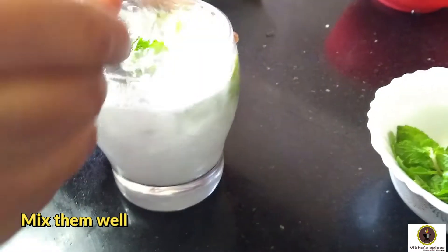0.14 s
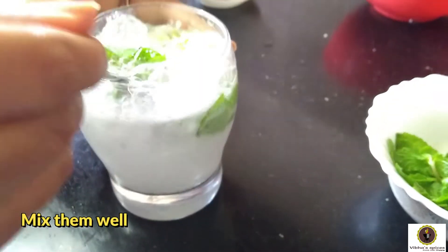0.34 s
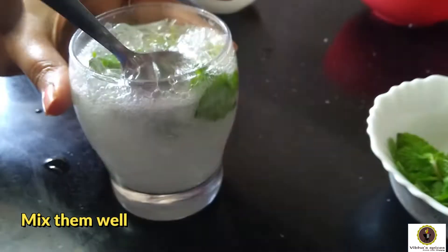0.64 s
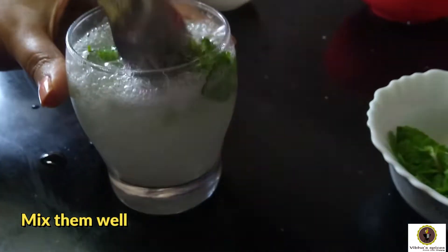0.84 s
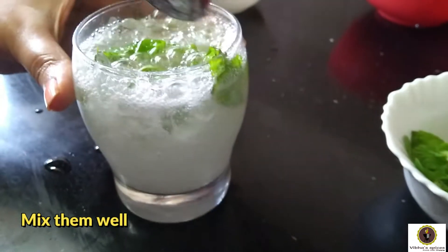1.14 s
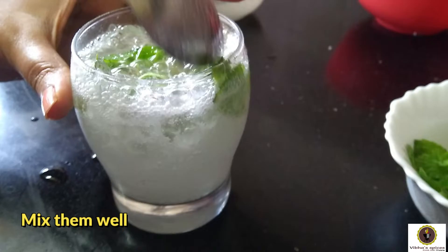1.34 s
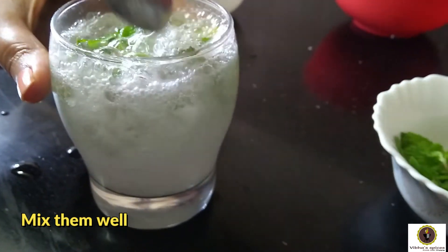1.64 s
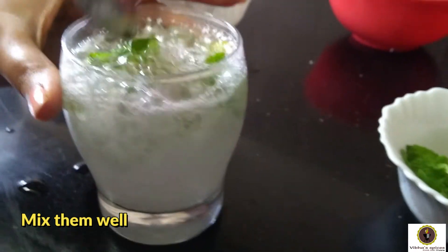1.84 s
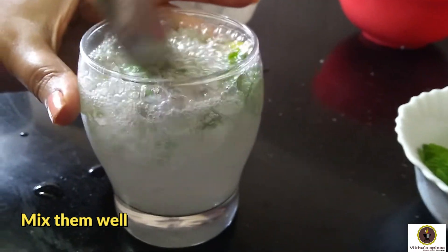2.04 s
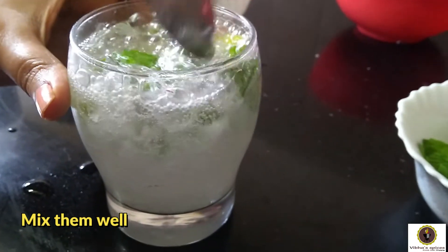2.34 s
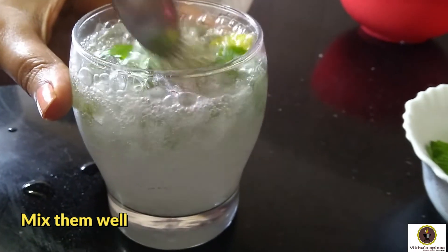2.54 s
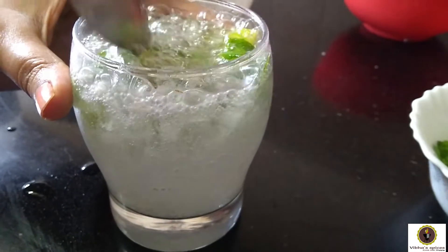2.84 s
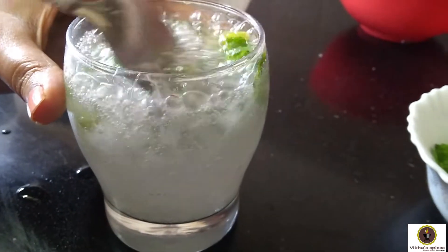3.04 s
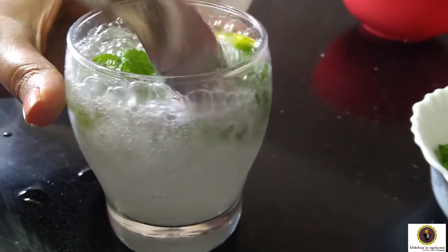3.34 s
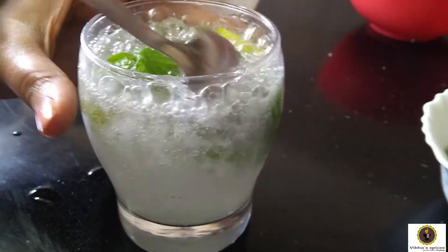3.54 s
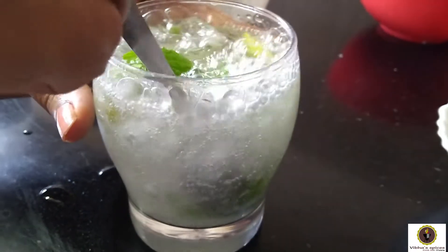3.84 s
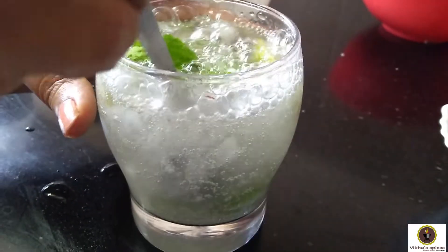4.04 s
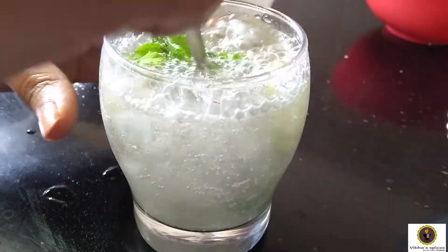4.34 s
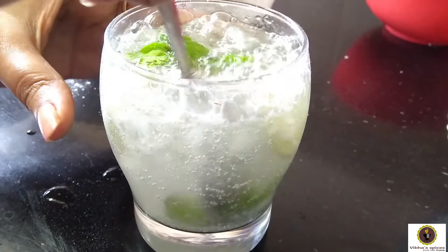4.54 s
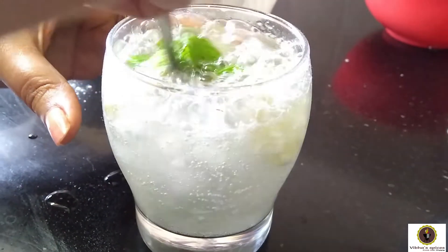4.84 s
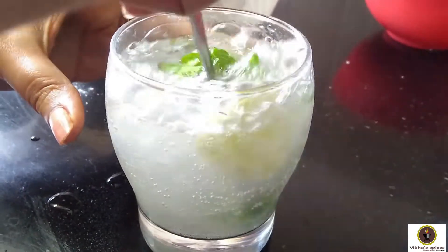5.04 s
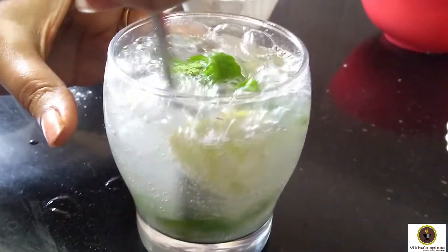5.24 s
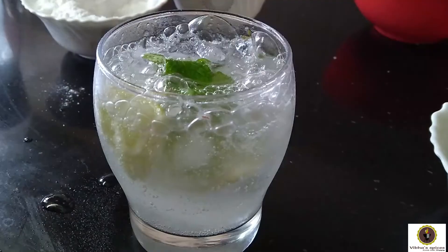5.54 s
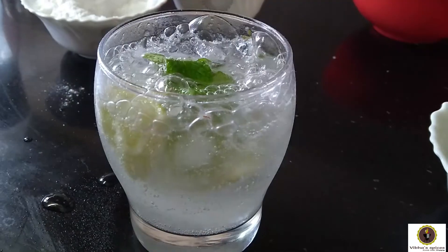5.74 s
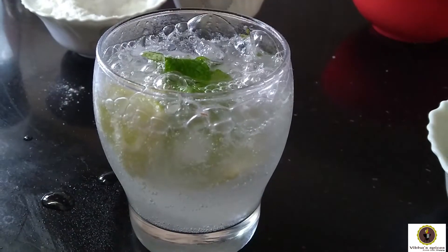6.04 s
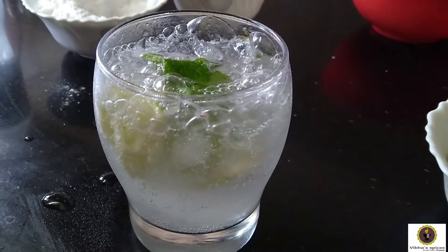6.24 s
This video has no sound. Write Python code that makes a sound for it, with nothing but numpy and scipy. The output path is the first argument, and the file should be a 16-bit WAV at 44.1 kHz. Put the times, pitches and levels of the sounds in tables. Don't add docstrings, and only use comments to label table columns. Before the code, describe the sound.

A close stereo microphone catches a spoon stirring ice and fizzy water in a glass. Bright hiss and crackling foam run throughout, with watery sloshes, small gulps and short, dull ice knocks in irregular clusters. A low machine hum and soft cupboard booms sit behind in a small kitchen. The stirring grows denser, then stops abruptly near the end, leaving only a barely audible hiss.

```python
import sys
import numpy as np
from scipy import signal
from scipy.fft import rfft, irfft, next_fast_len
from scipy.io import wavfile
from scipy.ndimage import uniform_filter1d

SR = 44100
rng = np.random.default_rng(int(sys.argv[2]) if len(sys.argv) > 2 else 0)


def invert_db(level):
    return 10 ** (np.asarray(level, dtype=float) / 20)


def generate_wav(sig):
    pcm = np.round(np.clip(np.atleast_2d(sig).T, -1, 1) * 32767).astype(np.int16)
    wavfile.write(sys.argv[1], SR, pcm)


N = 282240

# t/s, fizz level/dB, foam crackle level/dB, slosh level/dB
DRINK_LEVELS = [
    [(0.0, -41, -45, -57), (0.21, -38, -40, -46.5), (0.38, -42.5, -48, -58), (0.55, -40.5, -44, -44.5),
     (0.69, -40, -47.5, -53), (0.81, -41, -45, -42.5), (0.95, -40, -46, -57.5), (1.05, -42, -49.5, -85),
     (1.22, -44, -53.5, -73.5), (1.41, -41, -49.5, -52), (1.57, -39.5, -44.5, -51),
     (1.73, -39.5, -45.5, -45), (1.85, -43, -47, -48), (2.09, -41.5, -45, -56.5), (2.32, -43, -53.5, -52.5),
     (2.49, -41, -44, -46), (2.86, -40.5, -54, -57.5), (2.96, -39.5, -40.5, -49.5), (3.07, -43.5, -39, -77),
     (3.3, -43.5, -57.5, -51), (3.44, -41.5, -47, -42.5), (3.64, -42.5, -48.5, -54.5),
     (3.79, -39, -42.5, -49.5), (3.91, -46, -52.5, -65.5), (4.08, -42.5, -49, -52),
     (4.23, -41, -37.5, -40.5), (4.4, -47, -53, -60), (4.59, -47.5, -50.5, -68.5),
     (4.75, -43.5, -49.5, -48), (4.88, -43.5, -44.5, -57), (4.98, -42, -46.5, -42), (5.26, -42, -42, -56),
     (5.34, -43, -43.5, -42.5), (5.46, -36, -47.5, -58), (5.49, -42, -75, -73)],
    [(5.505, -64.5, -73, -80.5), (5.739, -59, -77, -75.5), (5.885, -58, -74, -72), (6.027, -58, -83, -64.5),
     (6.181, -62.5, -75, -74), (6.4, -60, -72, -81)],
]
# t/s, rumble level/dB, cupboard boom level/dB, counter drone and gulp level/dB
KITCHEN_LEVELS = [
    [(0.0, -49, -83, -48), (0.61, -47, -50, -70), (0.64, -46.5, -86, -49.5), (0.72, -54, -52.5, -58),
     (1.28, -53.5, -63.5, -57), (1.48, -47.5, -50.5, -67), (1.56, -46, -53, -63), (1.77, -50.5, -48, -47.5),
     (2.35, -43.5, -66.5, -60.5), (2.4, -46.5, -50, -64), (2.77, -50, -50, -85), (2.86, -46, -64, -42.5),
     (2.96, -47, -42.5, -77), (3.07, -46.5, -37.5, -79), (3.2, -70, -62, -75), (3.24, -58, -58.5, -61),
     (3.67, -53.5, -53.5, -58), (3.73, -52, -38, -53), (3.97, -53, -66.5, -66), (4.08, -50.5, -42, -54),
     (4.26, -48.5, -72, -42.5), (4.36, -50, -57, -57), (4.68, -69.5, -54, -55.5), (5.09, -49.5, -61.5, -57),
     (5.17, -51.5, -71, -63), (5.37, -42.5, -85, -60.5), (5.41, -45, -44, -42.5), (5.49, -43.5, -45, -54)],
    [(5.505, -78, -89, -78), (5.533, -83, -77, -71.5), (5.885, -66, -71, -70.5),
     (6.111, -75.5, -67.5, -72.5), (6.223, -63, -82, -66), (6.4, -57, -71, -80)],
]


def evened(x):
    return x / np.sqrt(np.mean(x ** 2) + 1e-20)


def read(points, hz):
    f, value = np.transpose(points)
    return np.interp(np.log(hz + 1), np.log(f + 1), value)


def level(spans, column):
    rows = np.vstack(spans)
    return invert_db(np.interp(np.arange(N) / SR, rows[:, 0], rows[:, column]))


def peaks(modes, hz):
    return sum(invert_db(db) / (1 + (2 * (hz - f) / width) ** 2) for f, width, db in modes)


def wash(shape, frame, same, patchy_db):
    hop = frame // 4
    a, b, c, d, patches = rng.standard_normal((N // hop + 5, frame // 2 + 1, 5)).T
    patches = evened(uniform_filter1d(uniform_filter1d(patches, 5, 0), 10, 1))
    first = a + 1j * b
    second = same * first + np.sqrt(1 - same ** 2) * (c + 1j * d)
    z = np.array([first, second])
    z *= shape(np.fft.rfftfreq(frame, 1 / SR))[:, None] * invert_db(patchy_db * patches)
    return evened(signal.istft(z, nperseg=frame, noverlap=frame - hop)[1][:, :N])


def pops(colour, low_hz, high_hz, cycles, per_s, spread_db, count=14):
    strength = invert_db(spread_db * np.minimum(rng.exponential(1, N), 5))
    bursts = strength * (rng.random(N) < per_s / SR)
    kind = rng.integers(0, count, N)
    t = np.arange(int(30 * SR / low_hz)) / SR
    out = np.zeros(N)
    for k, hz in enumerate(np.geomspace(low_hz, high_hz, count)):
        u = t * hz
        ring = np.sin(2 * np.pi * (u + 0.004 * u ** 2)) * u * np.exp(-u / cycles)
        ring *= invert_db(read(colour, hz)) * hz / np.linalg.norm(ring)
        out += signal.oaconvolve(bursts * (kind == k), ring)[:N]
    return evened(out)


def around(x, near_db, room_db):
    # f/Hz, t60/s
    decay = [(200, 0.19), (1500, 0.43), (5000, 0.067), (12000, 0.081)]
    taps = np.zeros((2, SR // 2))
    at = np.arange(200, SR // 2 - 20, 20) + rng.integers(0, 20, (2, (SR // 2 - 201) // 20))
    np.put_along_axis(taps, at, rng.choice([-1., 1.], at.shape), 1)
    hz, t, z = signal.stft(taps, SR, nperseg=256)
    tail = signal.istft(z * invert_db(-60 * t / read(decay, hz)[:, None]), SR, nperseg=256)[1]
    path = invert_db(room_db) * tail / np.linalg.norm(tail[0])
    near = rng.standard_normal((2, 260)) * (rng.random((2, 260)) < .06)
    near *= np.exp(-np.arange(260) / 124.0)
    path[:, 12:272] += invert_db(near_db) * near / np.linalg.norm(near, axis=1, keepdims=True)
    path[[0, 1], [8, 0]] += 1
    return signal.fftconvolve(x[None], path, axes=1)[:, :N]


def motor():
    # f/Hz, level/dB
    lines = [(97, -2.5), (126, 3.5), (150, -2.5)]

    def wander(smooth):
        noise = rng.standard_normal((3, N))
        return evened(uniform_filter1d(uniform_filter1d(noise, smooth, 1), smooth, 1))

    drift, throb = wander(9000), wander(2500)
    hz, db = np.transpose(lines)[..., None]
    turns = np.cumsum(hz * (1 + 0.0145 * drift), 1) / SR
    return evened((invert_db(db + 1.66 * throb) * np.sin(2 * np.pi * turns)).sum(0))


def kitchen():
    # f/Hz, level/dB per Hz
    rumble_colour = [(20, -21), (60, -36), (80, -13), (200, -14), (260, -20.5), (700, -33), (1200, -45.5),
                     (3000, -41), (5000, -50)]
    # f/Hz, width/Hz, level/dB
    hum_modes = [(104, 6.5, 8.5), (129.4, 14.7, -0.5), (146, 42, 0)]
    boom_modes = [(342, 18, -4), (385.7, 22, 0), (473.5, 70, 1)]
    drone_modes = [(772, 72, 16), (871, 24, 0.5), (1013, 69, 1)]
    rumble = wash(lambda hz: peaks(hum_modes, hz) + invert_db(read(rumble_colour, hz)), 4096, same=0.71, patchy_db=2.0)
    boom = wash(lambda hz: peaks(boom_modes, hz), 2048, same=0.51, patchy_db=6.5)
    drone = wash(lambda hz: peaks(drone_modes, hz), 1024, same=0.55, patchy_db=6.0)
    out = level(KITCHEN_LEVELS, column=1) * (invert_db(4.5) * rumble + invert_db(1.5) * motor())
    out += level(KITCHEN_LEVELS, column=2) * invert_db(-1.0) * boom
    return out + level(KITCHEN_LEVELS, column=3) * invert_db(-8.5) * drone


def fizz():
    # f/Hz, level/dB per Hz
    colour = [(1500, -30), (3000, -21), (4500, -4.5), (5500, -1), (7500, -5), (10000, -11.5), (13000, -22),
              (15500, -28.5)]
    hiss = wash(lambda hz: invert_db(read(colour, hz)), 256, same=0.1, patchy_db=2.5)
    pricks = pops(colour, low_hz=3500, high_hz=14040, cycles=1.13, per_s=2500, spread_db=2.5)
    pricks = around(pricks, near_db=15.5, room_db=-0.5)
    return level(DRINK_LEVELS, column=1) * (invert_db(0.5) * hiss + invert_db(-2) * evened(pricks))


def foam():
    # f/Hz, level/dB per Hz
    colour = [(900, -27.5), (1600, -16.5), (2500, 2), (3500, -3.5), (4800, 5), (7000, -41), (10000, -16.5)]
    hiss = wash(lambda hz: invert_db(read(colour, hz)), 256, same=0.13, patchy_db=4.0)
    crackle = pops(colour, low_hz=1400, high_hz=6000, cycles=1.4, per_s=700, spread_db=4.0)
    crackle = around(crackle, near_db=-2, room_db=-8)
    return level(DRINK_LEVELS, column=2) * (invert_db(1.5) * hiss + invert_db(4.5) * evened(crackle))


def slosh():
    # f/Hz, width/Hz, level/dB
    air_modes = [(1057, 27, 0.5), (1421, 140, 0.5), (1390, 60, -14), (1817, 600, -6)]
    # f/Hz, level/dB per Hz
    gulp_colour = [(350, 3), (600, 6.5), (1000, -11.5), (1500, -2.5)]
    swish = wash(lambda hz: peaks(air_modes, hz), 1024, same=0.302, patchy_db=5.0)
    gulps = pops(gulp_colour, low_hz=354.4, high_hz=1450, cycles=6.7, per_s=77, spread_db=5.5)
    gulps = around(gulps, near_db=-8, room_db=-7)
    out = level(DRINK_LEVELS, column=3) * invert_db(-0.5) * swish
    return out + level(KITCHEN_LEVELS, column=3) * invert_db(-4.5) * evened(gulps)


def splashes():
    # t/s, length/s, level/dB, centre f/Hz
    strokes = [(0.137, 0.27, -39.5, 4500), (1.389, 0.18, -30, 4200), (2.399, 0.11, -32, 3500),
               (2.802, 0.12, -36, 4870), (3.24, 0.087, -31.5, 4860), (3.694, 0.053, -33.5, 2600),
               (4.106, 0.019, -35, 1800), (4.189, 0.011, -25.5, 4040), (4.21, 0.015, -34, 2460),
               (4.255, 0.0083, -35, 2540), (4.836, 0.035, -32.5, 4500), (4.961, 0.015, -29, 1944),
               (5.013, 0.092, -35, 4000), (5.304, 0.091, -33, 4970), (5.408, 0.093, -31, 3500)]
    out = np.zeros(N)
    for s, length, db, hz in strokes:
        noise, lumps = rng.standard_normal((2, 8000))
        u = np.arange(8000) / SR / length
        lumps = invert_db(4.3 * evened(uniform_filter1d(uniform_filter1d(lumps, 60), 60)))
        band = signal.butter(2, [.5 * hz, min(1.54 * hz, 16000)], "band", fs=SR)
        spray = evened(signal.lfilter(*band, noise * lumps))
        out[round(s * SR):][:8000] += invert_db(db) * spray * np.minimum(u / 0.11, 1) * np.exp(-u ** 4.2)
    return out


def knocks():
    # t/s, low mode f/Hz, low level/dB, high mode f/Hz, high level/dB, tick level/dB
    hits = [(0.2507, 1770, -29, 4870, -28, -52), (0.4362, 2670, -20.5, 5740, -14, -42),
            (0.5287, 1960, -16, 4040, -8, -45), (0.765, 2430, -7, 4100, -8.5, -36),
            (1.3914, 2720, -15, 4130, -15, -54), (1.4095, 3650, -15, 5100, -26, -53),
            (1.443, 2600, -12, 4930, -17, -61), (1.46, 3480, -12, 4200, -1.5, -67),
            (1.517, 2600, -18, 5320, -26, -31), (1.5348, 3600, -20, 4400, -8, -59),
            (1.8953, 2520, -15, 6670, -20, -42), (2.065, 2410, -40, 7400, -5, -34),
            (2.101, 3100, -39, 6940, -17, -59), (2.1632, 3540, -46, 6720, -27, -48),
            (2.4022, 2690, -10, 5460, -19, -49), (2.417, 2520, -15, 4340, -9.5, -34),
            (2.4459, 2920, -25, 5600, -6.5, -39), (2.4802, 2520, -25, 4100, -28, -52),
            (2.818, 2630, -39, 5490, -12, -41), (2.8242, 2740, -38, 5530, -8.5, -36),
            (2.844, 3200, -37, 4570, -6.5, -29), (2.861, 2890, -3, 5400, -2, -45),
            (2.9186, 2710, -34, 4470, -11, -49), (2.9752, 2630, -47, 4080, -26, -40),
            (2.983, 2700, -44, 6440, -26, -46.5), (3.0931, 2680, -18.5, 6300, -12.5, -48.5),
            (3.2603, 3560, -14, 5670, -8, -40), (3.2699, 3620, -34, 3800, -9, -39.5),
            (3.284, 2740, -29, 6800, -18, -40.5), (3.2912, 3630, -35, 3820, -8, -46.5),
            (3.3357, 1790, -26, 3620, -19, -46), (3.3603, 3440, -12, 3820, -16, -37),
            (3.3793, 1730, -25, 5360, -13, -30.5), (3.5373, 2690, -23, 5770, -13.5, -52),
            (3.6977, 2350, -5, 3830, -36, -44), (3.7512, 2960, -6, 5670, -9, -32),
            (3.884, 3400, -38, 3930, -13, -30), (4.0804, 3400, -6, 3500, -21, -59),
            (4.1037, 2500, -11, 3920, -15, -37), (4.1572, 2350, -19, 4700, -7, -46),
            (4.1973, 1190, -17, 4470, -21, -16), (4.2233, 2600, -2.5, 4670, -18, -46),
            (4.2538, 1060, -21.5, 4570, -28, -31), (4.2708, 2970, -23, 3540, -21, -51),
            (4.3017, 3260, -5.5, 4800, -11, -38), (4.7612, 3600, -27, 3880, -9.5, -46),
            (4.8431, 3680, -11, 4400, -32, -36), (4.8608, 3330, -17, 4500, -6, -28),
            (4.8678, 2910, -41, 4650, -8.5, -20.5), (4.9131, 2110, -32, 4000, -18, -43),
            (4.9665, 1980, -16, 3900, -9, -41), (5.042, 3230, -33, 4600, -29, -48),
            (5.053, 3250, -11.5, 4520, -27, -50.5), (5.0742, 2950, -32, 4430, -11, -43),
            (5.091, 1910, -37, 4890, -20, -43), (5.1115, 3500, -11, 4180, -5, -36),
            (5.119, 2930, -33, 4610, -15, -48.5), (5.15, 3010, -38, 4460, -11, -19),
            (5.1862, 2420, -25, 5700, -11, -45), (5.2395, 2700, -44, 4320, -11.5, -54),
            (5.2813, 2150, -42, 6480, -21, -43), (5.2885, 2610, -42, 6060, -26, -42),
            (5.3064, 2100, -28, 5500, -15, -50), (5.3127, 2340, -24, 5300, -13, -47),
            (5.3632, 2686, -24, 4550, -10, -41), (5.378, 2480, -16, 5360, -8, -35),
            (5.4102, 2440, -9.5, 4120, -5, -29), (5.4788, 3300, -19, 4130, -19, -38)]
    # t/s, f/Hz, level/dB, t60/s
    thuds = [(2.402, 342, -35, 0.13), (3.70, 1000, -36, 0.023), (4.222, 1070, -19.5, 0.018),
             (4.961, 1170, -31, 0.17), (1.39, 1100, -55, 0.091), (0.69, 1500, -36.5, 0.04),
             (5.411, 293, -26.5, 0.056)]
    out, t = np.zeros(N), np.arange(2000) / SR
    treble = signal.butter(2, [7500, 16500], "band", fs=SR, output="sos")
    for s, low_hz, low_db, high_hz, high_db, tick_db in hits:
        noise = rng.standard_normal(2000)
        sound = invert_db(tick_db + 1) * signal.sosfilt(treble, noise) * np.exp(-t / .0011)
        for hz, db, cycles in ((low_hz, low_db, 2.4), (high_hz, high_db, 2.8)):
            damping, detune, phase = rng.random(3)
            main = np.sin(2 * np.pi * hz * t) * np.exp(-t * hz / (cycles * (.6 + .8 * damping)))
            side = np.sin(2 * np.pi * (hz * (.7 + .7 * detune) * t + phase)) * np.exp(-t * hz / 2.6)
            band = signal.butter(2, [.55 * hz, 1.6 * hz], "band", fs=SR)
            crack = signal.lfilter(*band, noise) * np.exp(-t / .0014)
            onset = 1 - np.exp(-t / 0.0001)
            sound += invert_db(db - 3.0) * (main + 0.4 * side + 0.54 * crack) * onset
        out[round(s * SR):][:2000] += sound
    out = signal.sosfilt(signal.butter(3, 950, "high", fs=SR, output="sos"), out)
    for s, hz, db, t60 in thuds:
        fade = invert_db(db - 60 * t / t60) * np.hanning(4000)[2000:]
        out[round(s * SR):][:2000] += fade * np.sin(2 * np.pi * hz * t)
    return out


def scene():
    change_s, fade_s = 5.494, 0.0021
    before_change = np.clip((change_s - np.arange(N) / SR) / fade_s, 0, 1)
    stirring = around(splashes() + knocks(), near_db=-3, room_db=-15)
    return kitchen() + fizz() + foam() + slosh() + stirring * before_change


def top_cut(x):
    return signal.sosfilt(signal.butter(12, 16260, fs=SR, output="sos"), x)


def record(dry):
    # f/Hz, level/dB
    left_port = [(300, 1.5), (3000, -1.5), (6000, -0.5), (9000, -2), (11500, -11.5), (13500, -6),
                 (16000, -4.5)]
    # f/Hz, lag/turns
    lag = [(0, 0), (2280, 1), (4600, 2), (7200, 3), (10200, 4), (15200, 6)]
    # f/Hz, share of the other port [1]
    share = [(100, 0.76), (2300, 0.61), (3450, 0.85), (4600, 0.69), (7000, 0.15), (9500, 0.1),
             (11500, 0.068), (15000, 0.26)]
    size = next_fast_len(N + 1000)
    hz = np.fft.rfftfreq(size, 1 / SR)
    ports = rfft(dry, size)
    ports[0] *= invert_db(read(left_port, hz))
    late = read(share, hz) * np.exp(-2j * np.pi * np.interp(hz, *np.transpose(lag)))
    wide = invert_db(-0.5) * irfft(ports - late * ports[::-1], size)[:, :N]
    return top_cut(wide)


dry = scene()
out = record(dry)
generate_wav(out)
```